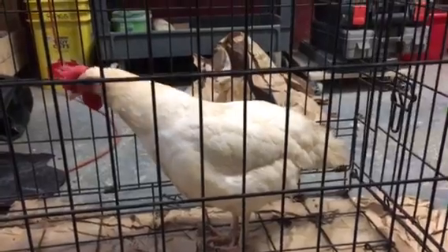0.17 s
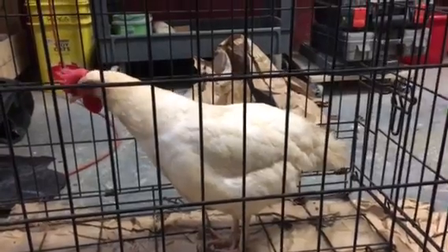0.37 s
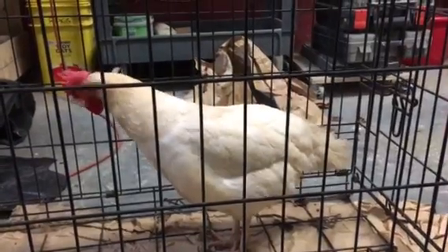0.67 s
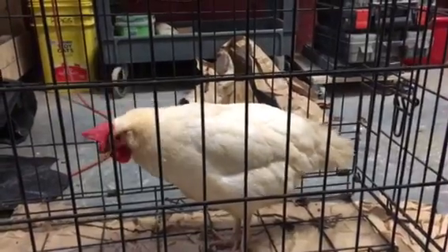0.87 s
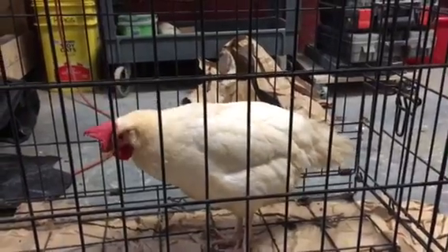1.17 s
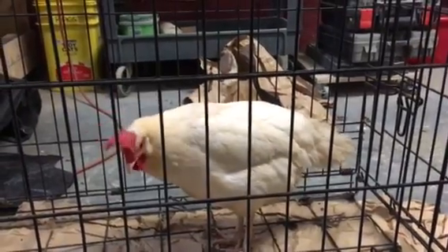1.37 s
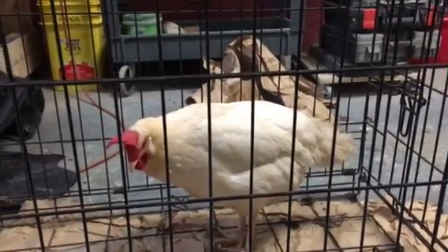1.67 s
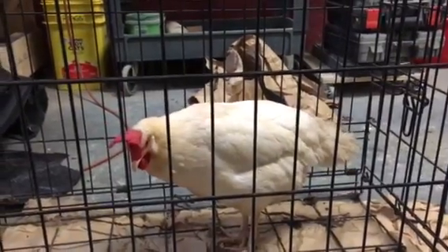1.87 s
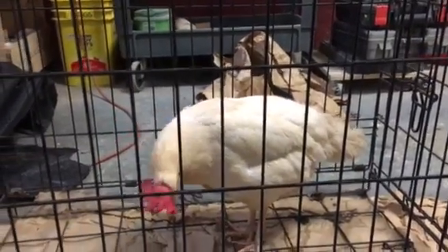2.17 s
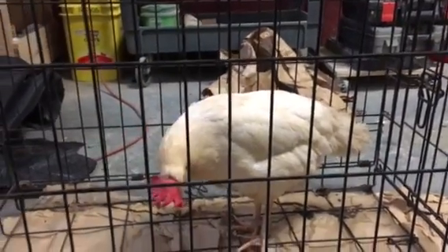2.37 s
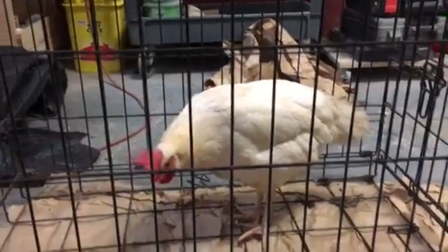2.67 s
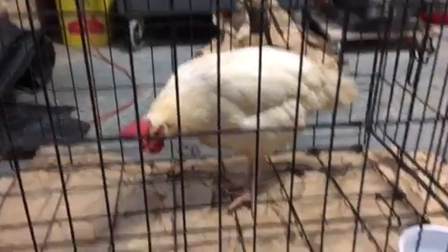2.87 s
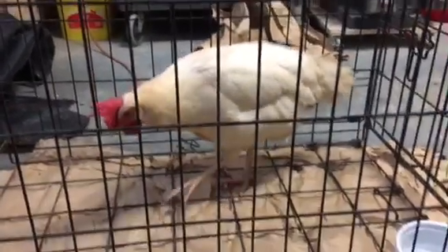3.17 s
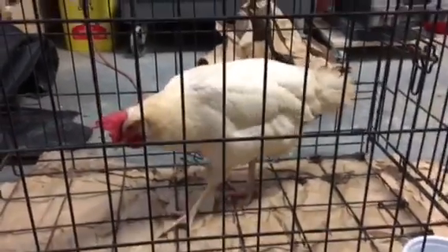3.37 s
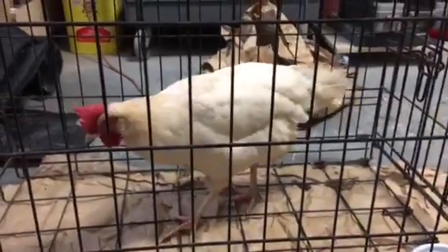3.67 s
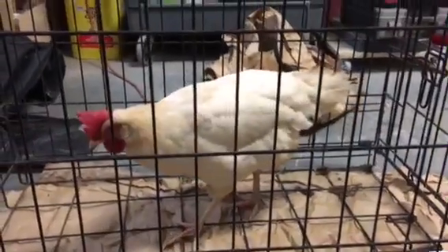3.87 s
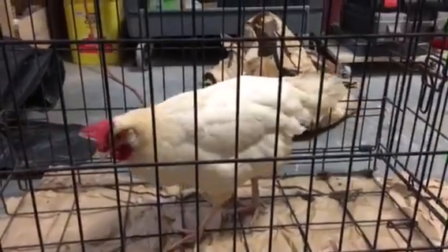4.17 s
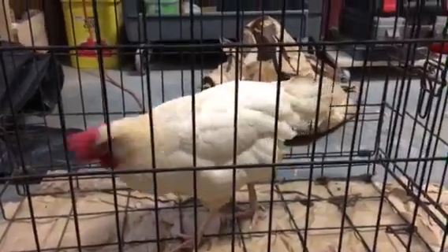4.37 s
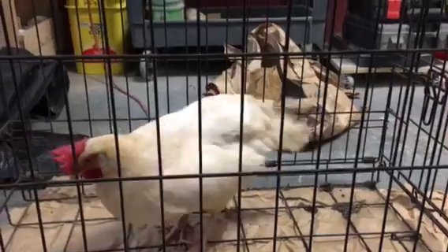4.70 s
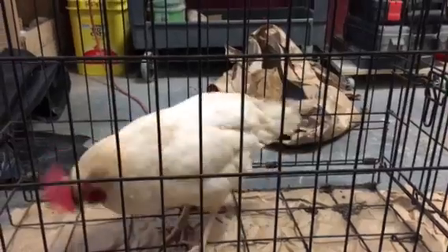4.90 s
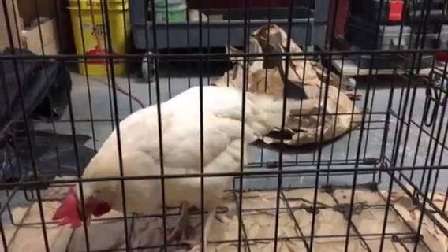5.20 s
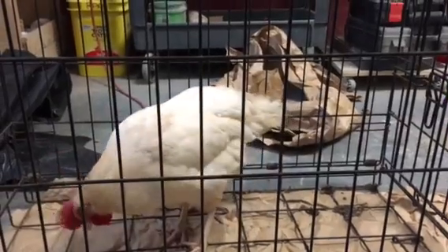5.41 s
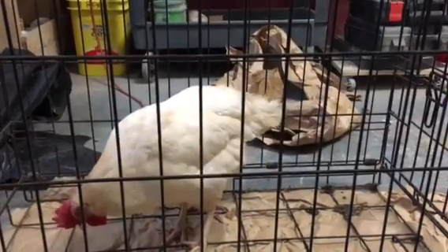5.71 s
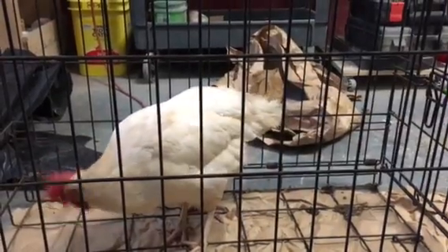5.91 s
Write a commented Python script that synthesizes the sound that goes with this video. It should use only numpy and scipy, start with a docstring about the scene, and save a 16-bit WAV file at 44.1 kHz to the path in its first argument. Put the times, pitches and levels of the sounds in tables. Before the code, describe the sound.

A hen gives four soft, short clucks, then pecks and taps lightly around a wire cage, her claws scuffing on cardboard. A small songbird repeats a faint whistled phrase in the distance. After one harder clank on the wire, a sharp, loud knock makes the cage rattle and ring briefly, and faint pecks follow. It is heard from beside the cage, in a slightly echoing workshop with a low motor hum.

```python
"""Four soft, nearly pure clucks come from a hen in a wire cage, over motors that hum and beat in a
workshop. She pecks, taps and thuds about the cage, each impact exciting modes of wire and floor,
and her claws drag on cardboard with a noise of friction. A small songbird repeats a whistled phrase
some way off. The hen knocks once sharply against the cage, which rattles and rings in free vibration.
The room answers both birds and every contact with a diffuse reverberation."""
import sys
import numpy as np
from scipy import signal
from scipy.fft import rfft, irfft, next_fast_len
from scipy.io import wavfile
from scipy.ndimage import map_coordinates

SR = 44100
rng = np.random.default_rng(int(sys.argv[2]) if len(sys.argv) > 2 else 0)


def output_pcm(signal):
    """Save a mono or channel-first signal as 16-bit PCM at the path in sys.argv[1].

    Samples are clipped to [-1, 1] before scaling.
    """
    pcm = np.clip(np.atleast_2d(signal).T, -1, 1) * 32767
    wavfile.write(sys.argv[1], SR, np.round(pcm).astype(np.int16))


N = 266805

# Reverberation of the workshop. Each row: frequency in Hz, time to decay by 60 dB (t60) in seconds.
ROOM_DECAY = [(120, 0.65), (500, 0.46), (1000, 0.62), (3000, 0.38), (6000, 0.31), (14000, 0.23)]
# The hen's calls. Each row: start in seconds, length in seconds, pitch in Hz, upward leap in Hz,
# level in dB, growth from start to end in dB, depth of the catch in dB.
CLUCKS = [(0.0, .068, 918.7, 28.4, -43, -7, 2.5), (.364, .05, 809, 24, -46.5, 13.5, 1),
          (0.573, 0.051, 835, 112, -41, 7.5, 13), (0.814, 0.057, 943, 95, -42, -4.5, -2.5)]
# Tones of the motors. Each row: frequency in Hz, rms level in dB.
MOTOR_TONES = [(55.43, -65.5), (59.17, -61.5), (118.37, -70), (120.05, -75)]
# Spectra of the background hiss and rumble. Each row: frequency in Hz, relative density in dB.
HISS_SPECTRUM = [(88, -26), (150, 0), (334, -7.5), (689, -13), (805, -13.5), (1720, -18), (2600, -22),
                 (13200, -22.5), (16000, -17.5)]
RUMBLE_SPECTRUM = [(20, -24), (38, 5), (48, -7), (62, -6.5), (80, 3.5), (100, -2.5), (125, 0.5), (170, -20),
                   (260, -32)]
# Short, sharp pecks, mostly faint, one a hard clank on wire. Each row: time in seconds, level in dB,
# relative crack level in dB, wire pitch in Hz.
PECKS = [(0.1397, -54, -24, 2450), (0.7146, -49.5, -23, 2530), (.914, -56.5, -8, 3020),
         (1.1631, -54, -7.5, 2005), (1.44, -46, -13, 3190), (2.096, -59, -22, 2180), (2.241, -58, -1, 3000),
         (3.4992, -29, -13, 2460), (3.7101, -53.5, 8, 2760), (4.569, -48.5, -14, 3650),
         (4.876, -46.5, 0, 3860), (5.113, -60, -1, 3800), (5.222, -61, 7, 3720), (5.274, -60, 4, 3550),
         (5.4408, -57, -7, 3780), (5.479, -50.5, 0.5, 2320), (5.5724, -54, 5, 2664),
         (5.925, -58.5, -22.5, 2540), (6.0293, -55, -7.5, 2590)]
# Taps and thuds on the cage, including the knock's rebound. Each row: time in seconds, level in dB,
# relative thud level in dB, thud centre in Hz, relative crack level in dB, rise time in seconds,
# wire pitch in Hz.
TAPS = [(0.94, -50, -28, 1025, 4, .005, 3130), (1.026, -41, -8, 880, -7.5, 0.0033, 2970),
        (2.998, -38, -23, 800, 6, 0.0059, 3100), (3.049, -55, -23, 500, 11, 0.0069, 3450),
        (3.104, -41.5, 4, 750, 1, 0.00069, 2420), (3.118, -49, 2.5, 332, -3.5, 0.0028, 2900),
        (3.41, -40.5, -10, 240, 0, 0.00035, 2270), (3.6426, -45, -12, 505, 8, .006, 3770),
        (3.688, -42, 6, 760, -7, .0003, 2650), (3.765, -39.5, -8, 257, -4.5, .0018, 3650),
        (4.6153, -33.5, -20, 600, 2.5, 0.0058, 3540), (4.623, -40.5, -20, 1220, 2, 0.0024, 2060),
        (4.7803, -36.5, 2, 1170, -18, .0005, 3400)]
# Spectra of a contact's snap and bright crack. Each row: frequency in Hz, relative density in dB.
SNAP_SPECTRUM = [(200, -27.5), (900, -18.5), (1800, -2), (3100, 3.5), (4200, -4), (6000, -17),
                 (10000, -19.5), (16000, -38.5)]
CRACK_SPECTRUM = [(1500, -17), (4000, -8.5), (6200, -2.5), (10000, -8.5), (15500, -6)]
# Modes of the hollow cage floor. Each row: frequency in Hz, relative level in dB, t60 in seconds.
FLOOR_MODES = [(186, -8, 0.08), (262, 0, 0.032), (442, -2.5, 0.03), (553, -1, 0.02), (745, -2.5, 0.021),
               (985, -4.5, 0.047), (1090, 2.5, 0.022), (1350, 3, 0.016), (1660, 1, 0.031)]
# Claw strokes. Each row: time of the hardest push in seconds, level in dB, extra crispness in dB.
SCUFFS = [(.96, -68, -2), (2.985, -49.5, -0.5), (3.056, -50, 2.5), (3.444, -54.5, -2.5), (3.66, -60, 3),
          (3.73, -53.5, -2), (4.532, -55, 2.5), (4.578, -47.5, -4.5)]
# Spectrum of claws rubbing cardboard. Each row: frequency in Hz, relative density in dB.
FRICTION_SPECTRUM = [(88, -34.5), (150, -3), (391, -7), (624, -1), (821, -6.5), (1100, -3), (3700, -1),
                     (7470, -11), (9080, -8.5), (16000, -15)]
# The songbird's phrase. Each row: start as a share of the phrase, length in seconds, first pitch
# in Hz, last pitch in Hz, warble depth in Hz, relative level in dB.
SONG_NOTES = [(0.0, .082, 4332, 4267, 430, -1), (0.236, .078, 3014, 3206, 150, 1),
              (0.476, .08, 2070, 1870, 90, -11.5), (.69, .078, 2380, 2798, 90, -0.5)]
# Contacts of the knock; the second is the main blow. Each row: time in seconds, rattle level in dB,
# rattle t60 in seconds, click level in dB, click pitch in Hz.
KNOCK_CONTACTS = [(4.6755, -29.5, 0.16, -29.5, 3280), (4.6807, -15, 0.018, -6, 7110),
                  (4.6831, -23.5, 0.051, -11.5, 3503), (4.6893, -20.5, 0.0099, -4.5, 8300),
                  (4.692, -28, 0.086, -35, 2680), (4.7052, -28, 0.032, -13, 3240)]
# Spectrum of the knock. Each row: frequency in Hz, relative density in dB.
KNOCK_SPECTRUM = [(60, -39.5), (130, -21), (400, -14), (750, -9), (1150, -9), (1800, -3.5), (2400, -8),
                  (3350, -0.5), (4500, -9), (6000, -6), (9700, -9), (10500, -10.5), (13500, -11.5),
                  (16000, -19.5)]
# Modes of the wire cage. Each row: frequency in Hz, relative level in dB, t60 in seconds.
CAGE_MODES = [(1090, -8.5, 0.51), (1810, -9, 0.32), (2290, -8, 0.61), (2690, -2, 0.25), (3140, -3.5, .25),
              (3300, -2.5, 0.16), (3635, -2.5, 0.14), (6645, -1.5, 0.16), (8100, -9, .2), (10100, -6, 0.16)]


def amp(db):
    """Amplitude ratio of a level in decibels."""
    return 10 ** (np.asarray(db) / 20)


def unit(x):
    """Normalisation to an rms of 1."""
    return x / np.sqrt(np.mean(x ** 2) + 1e-20)


def along(points, hz):
    """Interpolation of (Hz, value) points on a logarithmic frequency axis."""
    knots_hz, values = np.transpose(points)
    return np.interp(np.log(hz + 1), np.log(knots_hz + 1), values)


def clock():
    """Time of every sample in seconds."""
    return np.arange(N) / SR


def wobble(rate):
    """Smooth random modulation with `rate` knots a second."""
    return map_coordinates(rng.standard_normal(int(N * rate / SR) + 4), [np.arange(N) * rate / SR])


def filtered(x, response):
    """Linear filtering: the spectrum of x is multiplied by a frequency response."""
    size = next_fast_len(N + 8192)
    return irfft(rfft(x, size) * response(np.fft.rfftfreq(size, 1 / SR)), size)[:N]


def noise(spectrum):
    """White noise filtered to a spectrum, with an rms of 1."""
    return unit(filtered(rng.standard_normal(N), lambda hz: amp(along(spectrum, hz))))


def add(track, start, sound):
    """Superposition of a sound on the track, from `start` seconds."""
    part = track[round(start * SR):][:len(sound)]
    part += sound[:len(part)]


def gate(age, length, attack, release):
    """Envelope with a raised-cosine attack and release."""
    return np.sin(np.pi / 2 * np.clip(np.minimum(age / attack, (length - age) / release), 0, 1)) ** 2


def ring(hz, t60):
    """Free vibration of one mode: an exponentially damped sine."""
    t = np.arange(SR // 4) / SR
    return np.sin(2 * np.pi * hz * t) * amp(-60 * t / t60)


def bursts(rows):
    """Incoherent bursts add in power. Each row: peak time in s, level in dB, 20 dB rise and t60 in s."""
    power = np.zeros(N)
    for peak, db, rise, t60 in rows:
        span = slice(max(int((peak - .03) * SR), 0), int((peak + .4) * SR))
        t = np.arange(N)[span] / SR - peak
        power[span] += amp(db + np.where(t < 0, 20 * t / rise, -60 * t / t60)) ** 2
    return np.sqrt(power)


def room(x, build_s=0.00053, stretch=1.0):
    """Diffuse reverberation: convolution with a noise tail of unit energy whose treble dies first."""
    hz, t, spectra = signal.stft(rng.standard_normal(SR), SR, nperseg=256)
    t60 = stretch * along(ROOM_DECAY, hz)[:, None]
    tail = signal.istft(spectra * amp(-60 * t / t60), SR, nperseg=256)[1]
    tail *= 1 - np.exp(-np.arange(len(tail)) / SR / build_s)
    return signal.fftconvolve(x, tail / np.linalg.norm(tail))[:N]


def hen_clucks(octave_db=-27, jitter=0.011, shimmer_db=0.6, wet_db=-14):
    """Voicing through a closed beak: a nearly pure tone that catches midway, then leaps in pitch."""
    catch_s, catch_width_s = .025, .0048
    leap_s, leap_width_s = .0326, .0028
    t, voice = clock(), np.zeros(N)
    tremble = 1 + jitter * wobble(180)
    shimmer = shimmer_db * wobble(82)
    for start, length, pitch, leap_hz, level, growth_db, catch_db in CLUCKS:
        on = (t >= start) & (t < start + length)
        age = t[on] - start
        overshoot_hz = 40.8 * np.exp(-age / .0089)  # each cluck starts a little high
        leap = (1 + np.tanh((age - leap_s) / leap_width_s)) / 2
        hz = pitch + overshoot_hz + leap_hz * leap
        catch = np.exp(-((age - catch_s) / catch_width_s) ** 2)
        db = level + growth_db * (age / length - .5) - catch_db * catch
        phase = 2 * np.pi * np.cumsum(hz * tremble[on]) / SR
        effort = amp(db - db.max())  # the octave grows with effort
        tone = np.sin(phase) + effort * amp(octave_db) * np.sin(2 * phase)
        envelope = amp(db + shimmer[on]) * gate(age, length, attack=.0078, release=.0097)
        voice[on] += np.sqrt(2) * envelope * tone
    return voice + amp(wet_db) * room(voice)


def motors(hiss_db=-70, rumble_db=-68):
    """Beating: motors at slightly different speeds throb at the difference rate, over rumble and hiss."""
    t = clock() - .025
    hum = sum(amp(db) * np.sin(2 * np.pi * hz * t + .1 * wobble(2)) for hz, db in MOTOR_TONES)
    hiss = amp(hiss_db) * noise(HISS_SPECTRUM)
    rumble = amp(rumble_db) * noise(RUMBLE_SPECTRUM + [(1000, -89.5)])
    return np.sqrt(2) * hum + hiss + rumble


def contacts(peck_thud_db=-14.5, peck_thud_hz=1050, peck_rise_s=.00045, peck_t60=.016, tap_t60=.025):
    """Impulsive excitations: pecks, crackles and taps. Each row: as in TAPS, then t60 in seconds."""
    sharp = [(time, db, peck_thud_db, peck_thud_hz, crack_db, peck_rise_s, wire_hz, peck_t60)
             for time, db, crack_db, wire_hz in PECKS + cardboard_crackles()]
    return sharp + [(*tap, tap_t60) for tap in TAPS]


def pecks_and_taps(snap_wet_db=-8, clink_wet_db=-17, thud_wet_db=-11):
    """Impact sound: each contact radiates a snap and excites both the wire and the floor."""
    rows = contacts()
    snap = snaps(rows)
    clink = wire_clinks(rows)
    thud = floor_thuds(rows)
    to_room = amp(snap_wet_db) * snap + amp(clink_wet_db) * clink + amp(thud_wet_db) * thud
    return snap + clink + thud + room(to_room)


def snaps(rows, body_db=-3, crack_t60_ratio=0.97, grain_db=4):
    """A brief force has a broad spectrum: a grainy burst of noise with a brighter crack."""
    body = bursts([(time, db, rise, t60) for time, db, *_, rise, _, t60 in rows])
    crack = bursts([(time, db + crack_db, rise, t60 * crack_t60_ratio)
                    for time, db, _, _, crack_db, rise, _, t60 in rows])
    smooth = amp(body_db) * body * noise(SNAP_SPECTRUM) + crack * noise(CRACK_SPECTRUM)
    return smooth * unit(amp(grain_db * wobble(1500)))


def wire_clinks(rows, gain_db=-0.5, t60=.013, overtone_ratio=1.53, overtone_db=-7):
    """Damped vibration: each contact flicks the nearest wire, which rings in two inharmonic modes."""
    out = np.zeros(N)
    for time, db, *_, wire_hz, _ in rows:
        clink = ring(wire_hz, t60) + amp(overtone_db) * ring(overtone_ratio * wire_hz, t60)
        add(out, time, amp(db + gain_db) * clink)
    return out


def floor_thuds(rows, gain_db=3, width_octaves=.8, scatter_db=2.5):
    """Selective excitation: a soft contact drives the low modes of the floor, a hard one the high."""
    out = np.zeros(N)
    hz, level, t60 = np.transpose(FLOOR_MODES)
    modes = ring(hz[:, None], t60[:, None])
    for time, db, thud_db, thud_hz, *_ in rows:
        excitation = np.exp(-(np.log2(hz / thud_hz) / width_octaves) ** 2)
        weights = amp(level - scatter_db * rng.standard_normal(len(hz))) * excitation
        weights *= rng.choice([-1, 1], len(hz)) / np.linalg.norm(weights)
        add(out, time, amp(db + thud_db + gain_db) * weights @ modes)
    return out


def stick_slip(rub, grain_db=5, catch_db=2):
    """Friction proceeds in tiny uneven catches, which modulate the amplitude of its noise."""
    return unit(rub * amp(grain_db * wobble(900) + catch_db * wobble(110)))


def scuffs_and_rustle(dull_db=-2, crisp_db=-5, split_hz=4800, wet_db=-8):
    """Friction noise: claws drag over cardboard, and feathers and feet settle after the knock."""
    rise_db_per_s, fall_db_per_s = 278, 427
    rustle_db, rustle_crisp_db, rustle_fall_db_per_s = -59, 4, 29
    t = clock()
    since_knock = t - KNOCK_CONTACTS[0][0]
    push = amp(rustle_db - rustle_fall_db_per_s * abs(since_knock)) * (since_knock > 0)
    crisp_push = amp(rustle_crisp_db) * push
    for peak, db, extra_db in SCUFFS:
        stroke = amp(db - np.maximum(rise_db_per_s * (peak - t), fall_db_per_s * (t - peak)))
        push = np.maximum(push, stroke)
        crisp_push = np.maximum(crisp_push, amp(extra_db) * stroke)
    rub = noise(FRICTION_SPECTRUM)
    dull = filtered(rub, lambda hz: 1 / (1 + (hz / split_hz) ** 4))
    dry = amp(dull_db) * push * stick_slip(dull)
    dry += amp(crisp_db) * crisp_push * stick_slip(rub - dull)
    return dry + amp(wet_db) * room(dry)


def song_phrases(count=8, first_s=2.122, steady_s=.341, hurry=.085, steady_db=-66, soft_db=-3):
    """A soft, hurried start relaxes to an even pace. Each row: start and length in s, level in dB."""
    unsettled = .62 ** np.arange(count)
    periods = steady_s * (1 - hurry * unsettled)
    starts = first_s + np.cumsum(periods) - periods
    return zip(starts, periods, steady_db + soft_db * unsettled ** 2)


def songbird(warble_hz=27.83, waver=0.02, direct_db=-11, wet_db=-1.6):
    """Frequency modulation makes four whistles burry; at a distance, echoes outweigh direct sound."""
    t, song = clock(), np.zeros(N)
    drift = 1 + waver * wobble(300)
    for phrase_start, period, level in song_phrases():
        for share, length, from_hz, to_hz, depth_hz, db in SONG_NOTES:
            start = phrase_start + share * period
            on = (t >= start) & (t < start + length)
            age = t[on] - start
            glide = from_hz + (to_hz - from_hz) * age / length
            hz = glide + depth_hz * np.cos(2 * np.pi * warble_hz * age)
            tone = np.sin(2 * np.pi * np.cumsum(hz * drift[on]) / SR)
            envelope = amp(level + db) * gate(age, length, attack=.014, release=.023)
            song[on] += np.sqrt(2) * envelope * tone
    echoes = room(song, build_s=.002, stretch=1.55)
    return amp(direct_db) * song + amp(wet_db) * echoes


def cage_knock(click_cycles=10, overtone_db=-1, ring_db=-41, boom_db=-40.5, boom_t60=0.13, echo_db=1):
    """Impact with rebound: a hard blow chatters, excites the modes of the cage and shakes its floor."""
    rattle = bursts([(time, db, .0001, t60) for time, db, t60, _, _ in KNOCK_CONTACTS])
    dry = rattle * noise(KNOCK_SPECTRUM)
    low_cut = signal.butter(2, 900, "high", fs=SR, output="sos")  # the clicks carry little bass
    for time, _, _, db, hz in KNOCK_CONTACTS:
        t60 = click_cycles / hz
        click = ring(hz, t60) + amp(overtone_db) * ring(1.55 * hz, t60 / 2)
        add(dry, time, amp(db) * signal.sosfilt(low_cut, click))
    blow_s = KNOCK_CONTACTS[1][0]
    age = np.maximum(clock() - blow_s, 0)
    for hz, db, t60 in CAGE_MODES:
        phase = 2 * np.pi * hz * age + .5 * wobble(150)  # rattling joints blur each spectral line
        dry += amp(ring_db + db - 60 * age / t60) * np.sin(phase) * (age > 0)
    boom = noise([(80, -44), (135, -2), (280, -8), (420, -13), (1500, -43)])
    dry += bursts([(blow_s + .025, boom_db, .01, boom_t60)]) * boom
    # the main blow fills the room as one broadband pulse
    impulse = signal.unit_impulse(N, round(blow_s * SR))
    pulse = filtered(impulse, lambda hz: amp(along(KNOCK_SPECTRUM, hz)))
    return dry + amp(echo_db) * room(pulse / np.linalg.norm(pulse))


def cardboard_crackles(count=5, early_s=4.7, late_s=4.97, db=-62.5, spread_db=2.5):
    """Relaxation: trodden cardboard settles in faint, irregular crackles. Each row: as in PECKS."""
    crack_db, wire_hz = 6.5, 3740
    slot_s = (late_s - early_s) / count
    return [(late_s - slot_s * (slot + offset), db + spread_db * (2 * size - 1), crack_db, wire_hz)
            for slot, (offset, size) in enumerate(rng.random((count, 2)))]


def scene():
    """Superposition of all sources, heard from beside the cage."""
    hen = hen_clucks() + pecks_and_taps() + cage_knock() + scuffs_and_rustle()
    return (hen + songbird() + motors())[None]


def record(dry, top_hz=16100):
    """Band limiting: an ideal low-pass filter removes everything above top_hz."""
    return filtered(dry[0], lambda hz: hz < top_hz)[None]


dry = scene()
out = record(dry)
output_pcm(out)
```